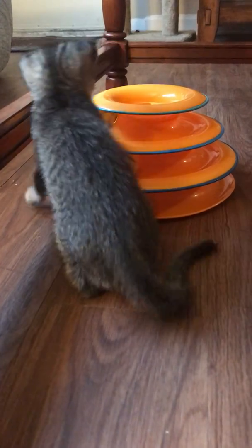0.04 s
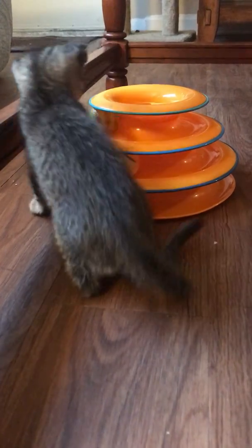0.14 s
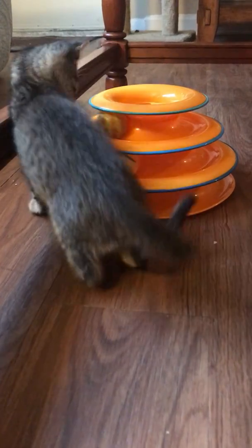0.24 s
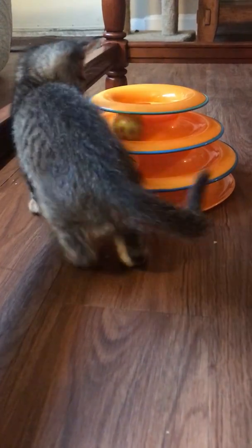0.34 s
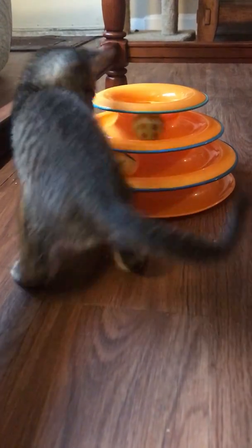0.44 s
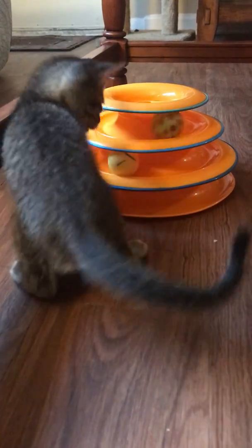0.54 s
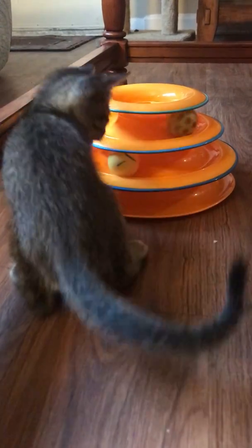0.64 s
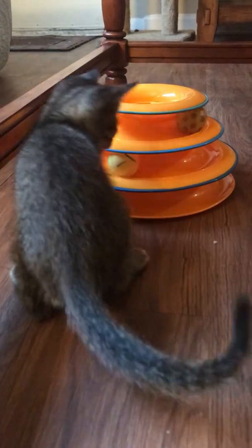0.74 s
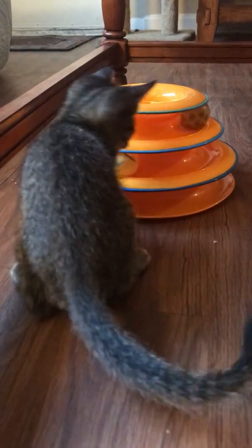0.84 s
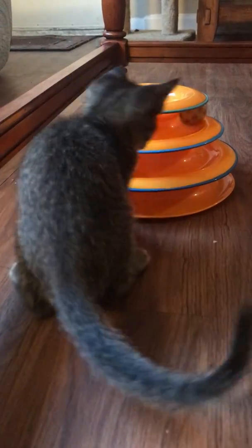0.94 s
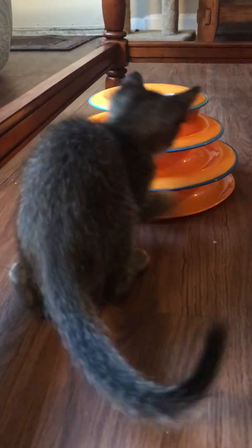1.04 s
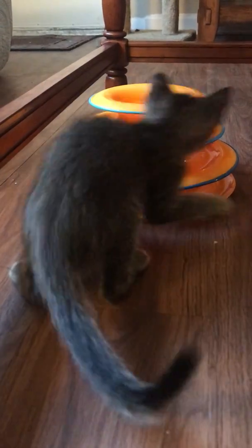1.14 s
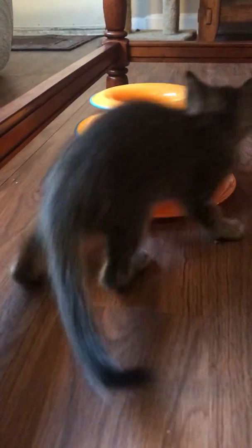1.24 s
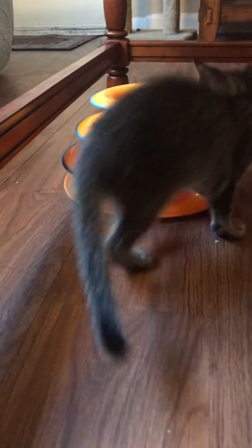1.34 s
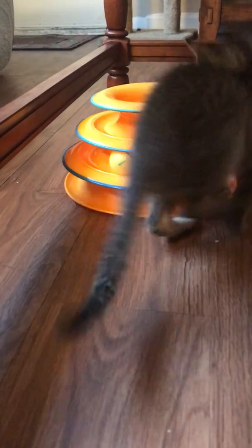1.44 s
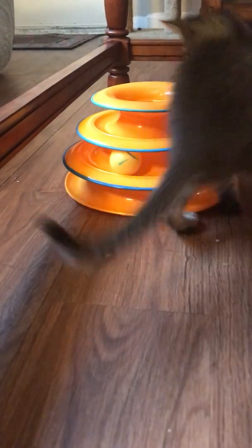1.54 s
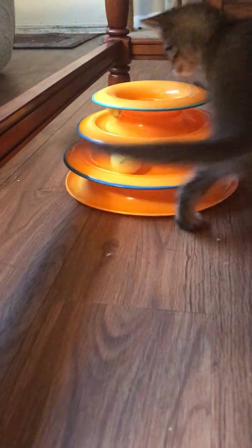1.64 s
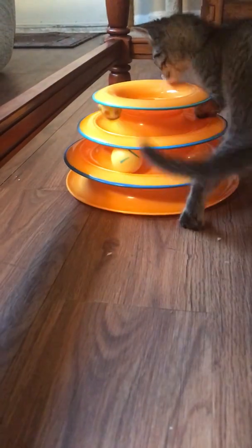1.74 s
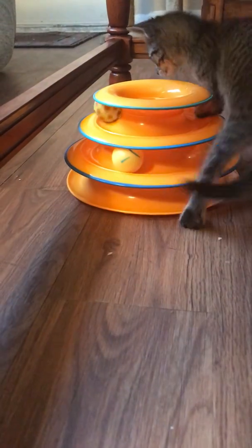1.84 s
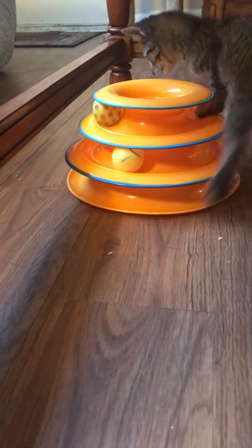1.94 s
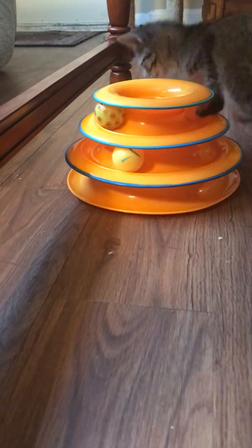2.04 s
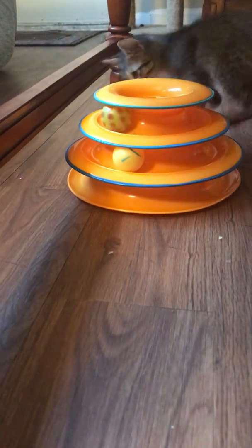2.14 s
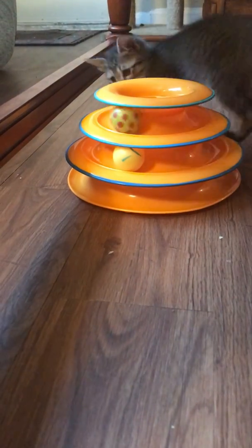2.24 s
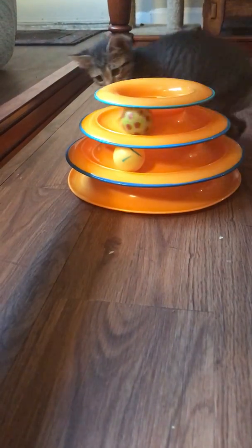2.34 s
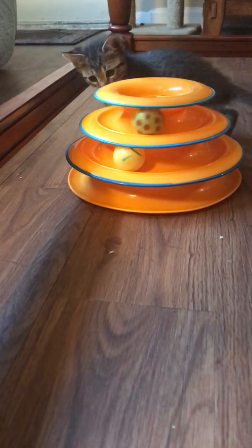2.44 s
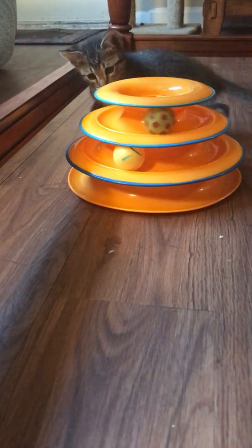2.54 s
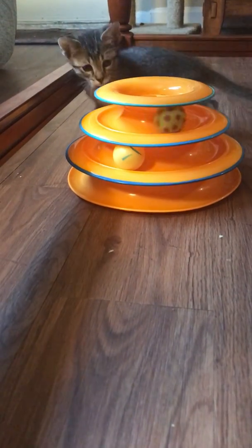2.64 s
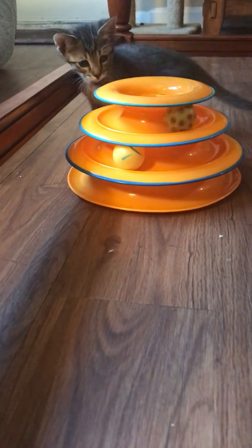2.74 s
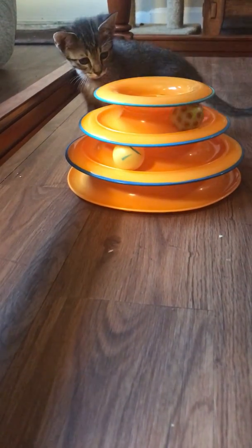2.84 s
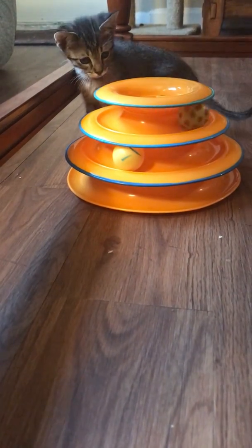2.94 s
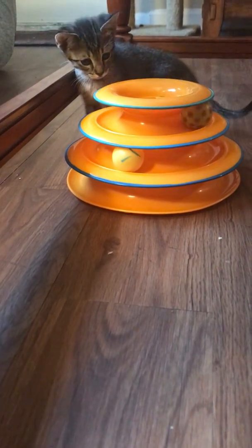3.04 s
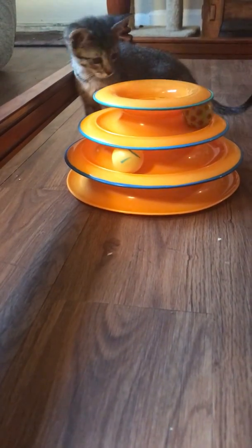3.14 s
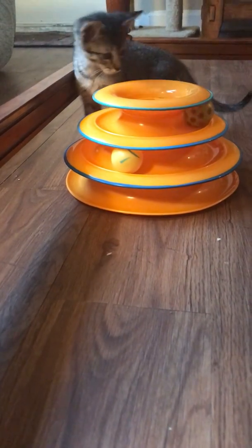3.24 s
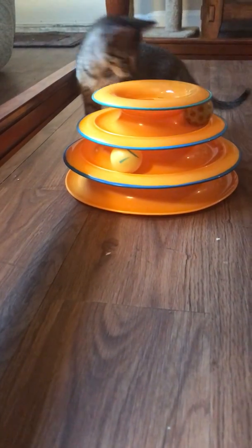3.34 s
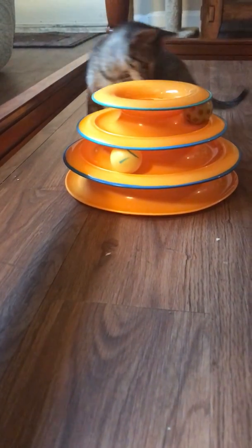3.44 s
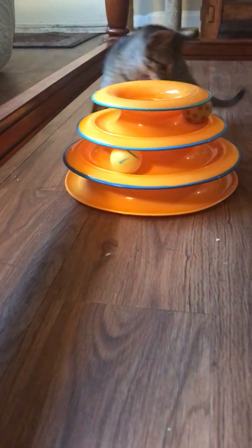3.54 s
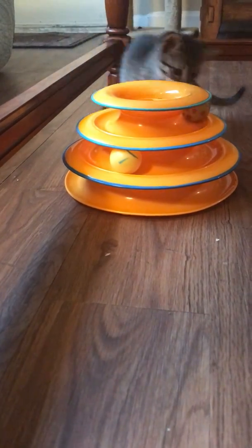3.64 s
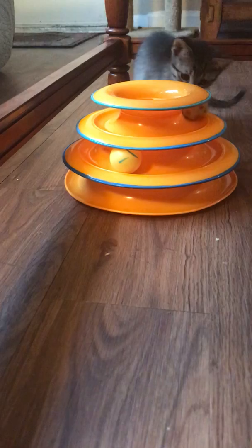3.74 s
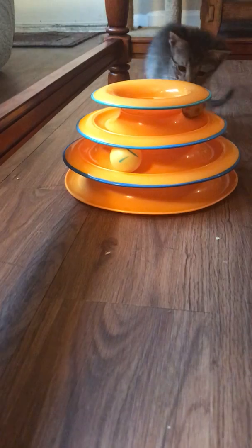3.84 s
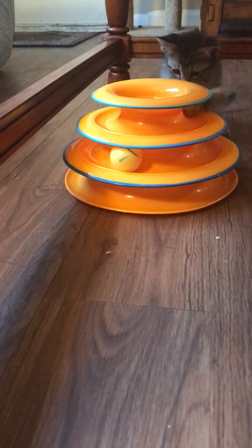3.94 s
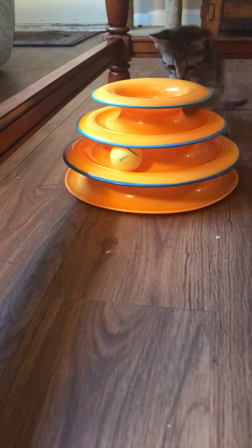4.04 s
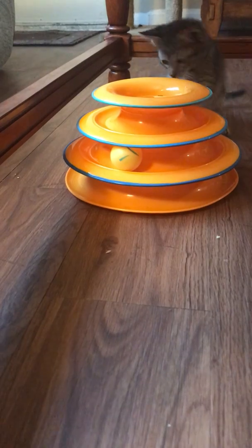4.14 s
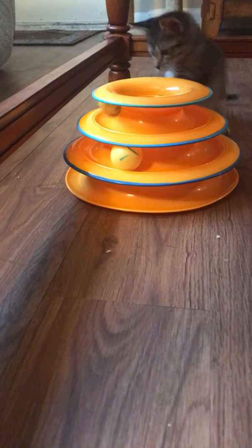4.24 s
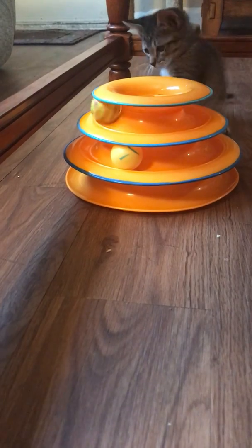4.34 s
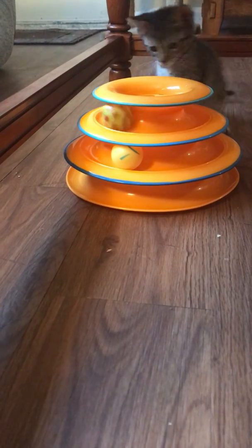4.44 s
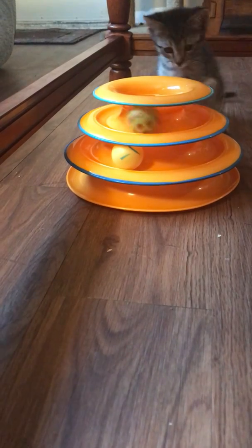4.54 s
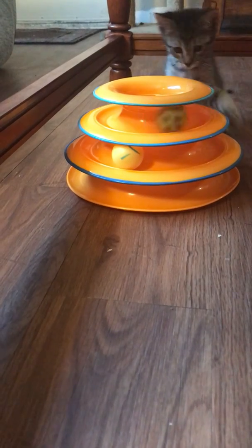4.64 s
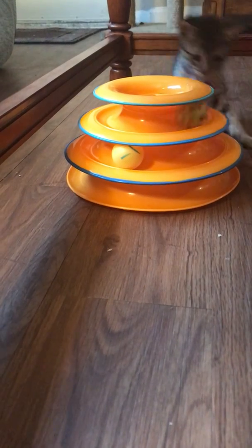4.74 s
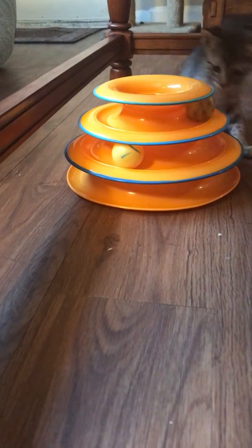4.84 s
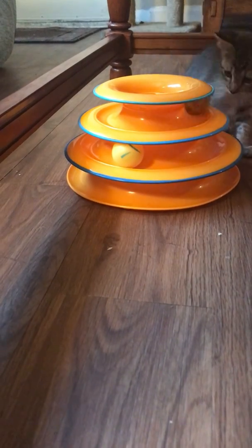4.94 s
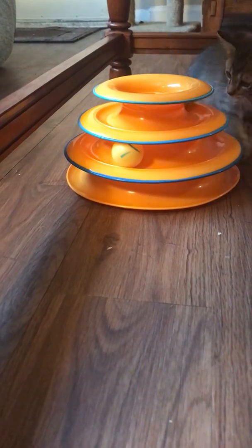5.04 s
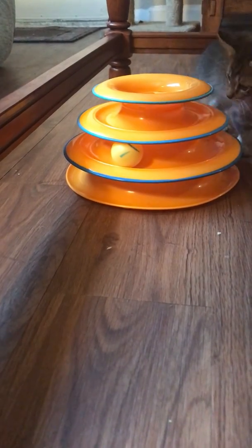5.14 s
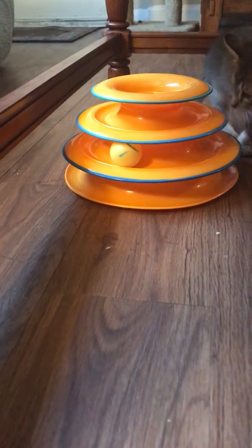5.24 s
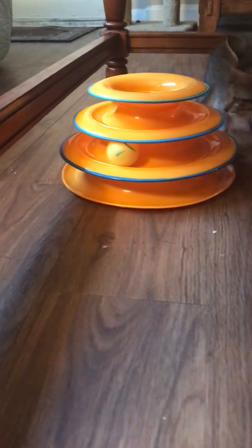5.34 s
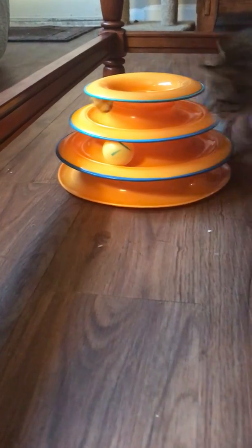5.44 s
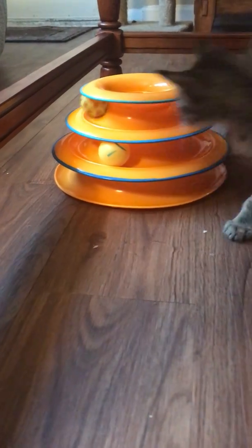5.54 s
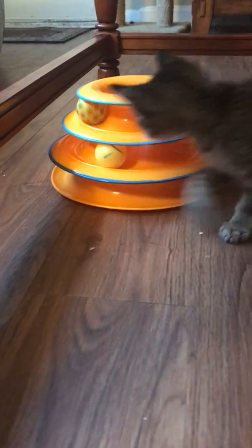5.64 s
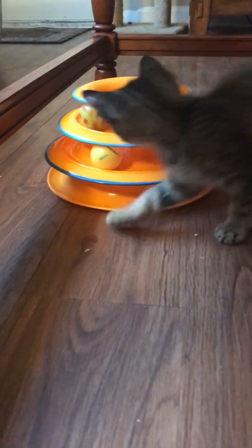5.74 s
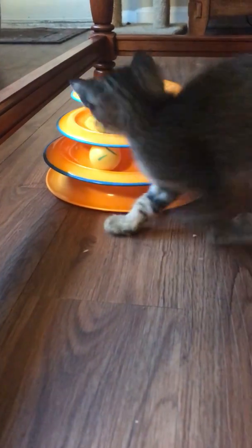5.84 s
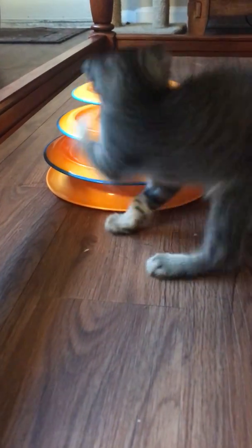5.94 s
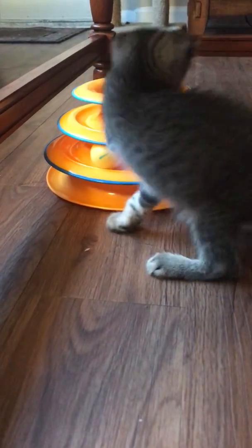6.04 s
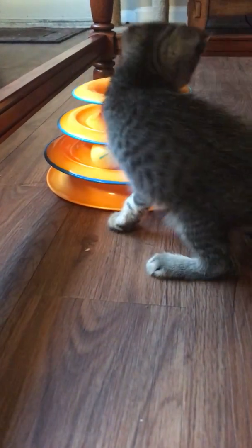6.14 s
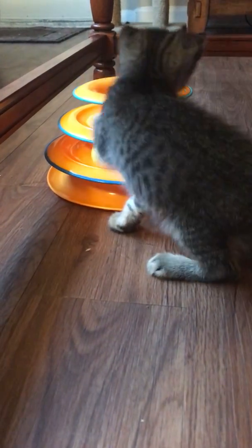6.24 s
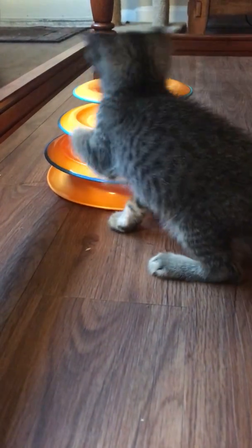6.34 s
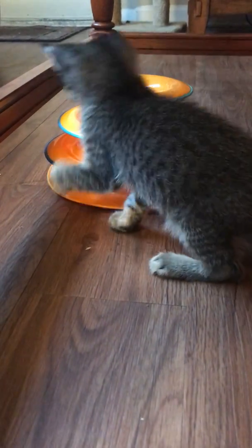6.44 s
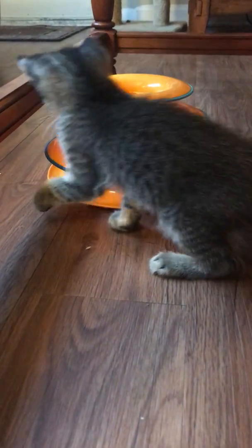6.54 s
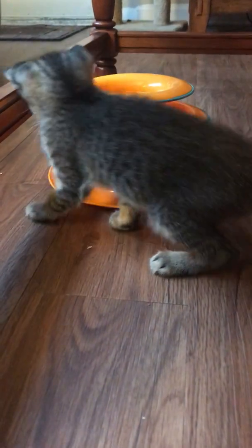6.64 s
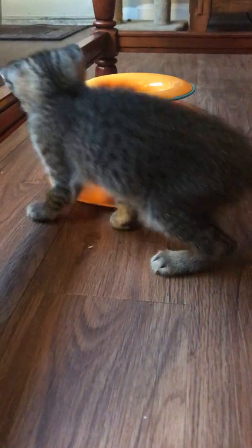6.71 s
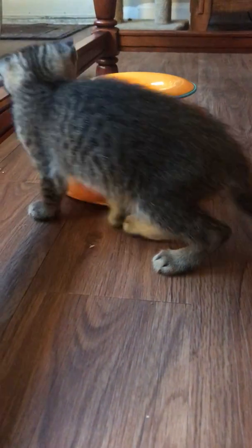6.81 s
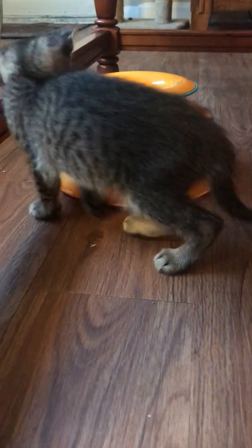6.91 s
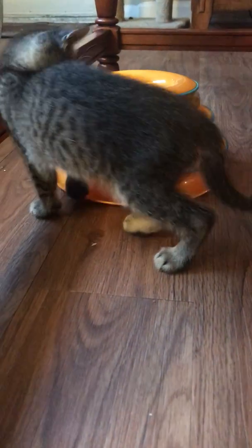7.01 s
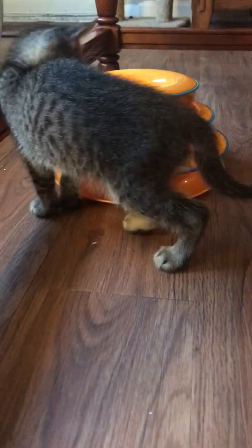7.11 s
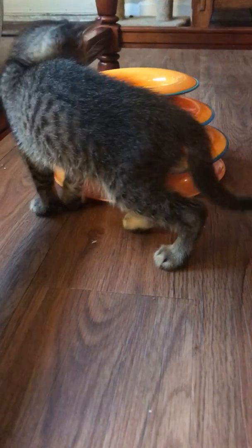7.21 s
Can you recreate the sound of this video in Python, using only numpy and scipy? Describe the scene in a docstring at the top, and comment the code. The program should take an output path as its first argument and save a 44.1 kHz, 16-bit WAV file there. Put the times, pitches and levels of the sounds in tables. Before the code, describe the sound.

Quiet room with soft air noise and low hum. A light holed plastic ball stumbles along a hollow plastic track, giving woody, boxy knocks and a rough rumble that fades, with fur brushes, claw ticks and a crisp snap midway. After a short rest, sharp knocks and brief squeaky slides restart a busier roll lasting to the end. Near microphone, short small-room echo.

```python
"""Over a quiet room with an appliance hum, a kitten bats hollow plastic balls round a tower toy on laminate.
First a ball rumbles and knocks along its track, with claw ticks, soft scuffs and a hard snap near 2.4 s;
it stalls at 3.5 s, and from 4 s a swat brings harder knocks, firm slides and a second roll to the end.
Random bumps and bursts of noise ring the toy's resonances; shaped noise makes fur, claws, snaps and ball whistle.
The room is coloured noise with wavering tones, and a short noise tail gives its echo."""
import sys
import numpy as np
from scipy import signal
from scipy.fft import rfft, irfft, next_fast_len
from scipy.io import wavfile
from scipy.ndimage import map_coordinates

SR = 44100
rng = np.random.default_rng(int(sys.argv[2]) if len(sys.argv) > 2 else 0)


def generate_wav(signal):
    """Clip the signal to [-1, 1] and save it as 16-bit WAV at the path in sys.argv[1]."""
    frames = np.transpose(np.atleast_2d(signal))
    scaled = np.clip(frames, -1, 1) * 32767
    pcm = np.round(scaled).astype(np.int16)
    wavfile.write(sys.argv[1], SR, pcm)


N = 320607  # length in samples


def amp(db):
    """Gain of a level in dB."""
    return 10 ** (np.asarray(db) / 20)


def unit(x):
    """Scale to rms 1."""
    return x / np.sqrt(np.mean(x ** 2) + 1e-20)


def along(points, hz):
    """Read a curve of (Hz, value) points on a log frequency axis."""
    point_hz, values = np.transpose(points)
    return np.interp(np.log(hz + 1), np.log(point_hz + 1), values)


def wobble(rate):
    """A smooth random curve with the given number of knots a second."""
    knots = rng.standard_normal(int(N * rate / SR) + 4)
    return map_coordinates(knots, [np.arange(N) * rate / SR])


def filtered(x, response):
    """Pass x through a complex response, given as a function of frequency."""
    size = next_fast_len(N + SR // 2)
    spectrum = rfft(x, size) * response(np.fft.rfftfreq(size, 1 / SR))
    return irfft(spectrum, size)[..., :N]


def causal(gain):
    """Minimum-phase response: the given magnitudes with no ringing ahead of the hit."""
    cepstrum = irfft(np.log(gain + 1e-6))
    half = len(cepstrum) // 2
    cepstrum[1:half] *= 2
    cepstrum[half + 1:] = 0
    return np.exp(rfft(cepstrum))


def noise(spectrum):
    """Coloured noise of rms 1."""
    return unit(filtered(rng.standard_normal(N), lambda hz: amp(along(spectrum, hz))))


# colour of the room's air: [pitch_hz, relative density_db per Hz]
AIR_COLOUR = [(20, -35), (30, -17), (50, -1.5), (100, 1), (150, -7.5), (300, -13), (600, -12.5),
              (1200, -15), (2000, -21.5), (4000, -29), (6000, -35), (10500, -41), (13000, -39),
              (16000, -40)]
# colour of the deep rumble: [pitch_hz, relative density_db per Hz]
RUMBLE_COLOUR = [(20, -47), (35, -6), (60, 1), (95, -0.5), (125, 0), (200, -63)]
# appliance tones: [pitch_hz, level_db rms before wavering]
HUM_TONES = [(120, -64), (122.8, -66.5), (166, -70.5), (246, -76.5), (369, -74.5)]
AIR_DB, RUMBLE_DB, RUMBLE_SWELL_DB = -59.5, -62.5, 1.5


def room_tone():
    """Steady air noise, a deep swelling rumble and appliance tones that waver in level and phase."""
    t = np.arange(N) / SR
    hum = np.zeros(N)
    for hz, db in HUM_TONES:
        level = np.sqrt(2) * amp(db + 1.9 * wobble(6.0))
        phase = 1.33 * wobble(3) + 2 * np.pi * rng.random()
        hum += level * np.sin(2 * np.pi * hz * t + phase)
    air = amp(AIR_DB) * noise(AIR_COLOUR)
    rumble = amp(RUMBLE_DB + RUMBLE_SWELL_DB * wobble(1.26)) * noise(RUMBLE_COLOUR)
    return hum + air + rumble


# how long the room rings: [pitch_hz, t60_s]
ROOM_DECAY = [(200, 0.13), (2000, 0.22), (10000, 0.078)]


def walls(x):
    """Each frequency of the room's answer dies at its own speed; four paths scatter the sound differently."""
    hz, t, grains = signal.stft(rng.standard_normal((4, SR // 3)), SR, nperseg=256)
    decay = amp(-60 * t / along(ROOM_DECAY, hz)[:, None])
    tails = signal.istft(grains * decay, SR, nperseg=256)[1]
    tails = tails / np.linalg.norm(tails[0])
    # the paths take turns, 64 samples each
    path = (np.arange(N) // 64) % 4 == np.arange(4)[:, None]
    wet = signal.oaconvolve(x * path, tails, axes=1).sum(0)
    return np.pad(wet, (200, 0))[:N]  # the answer starts 200 samples late


# colour of fur on plastic: [pitch_hz, relative density_db per Hz]
FUR_COLOUR = [(1470, -38), (2500, -5), (3110, -18), (3660, -10), (4910, -11), (7710, -9), (8330, -8),
              (9580, -6), (14200, -0.5), (16000, -2.5)]


def tilted(drive):
    """Colour a dull and a bright drive as fur on plastic, parted at 7.5 kHz."""
    def response(hz):
        fur = amp(along(FUR_COLOUR, hz))
        dull = 1 / (1 + (hz / 7500) ** 4)
        return np.array([causal(unit(fur * dull)), causal(unit(fur * (1 - dull)))])
    return filtered(drive, response).sum(0)


SLIDE_FADE_DB = -4.5  # change from start to end of a slide


def slide(s, length):
    """Pressure of a slide: it starts and stops within ms and eases off on the way."""
    t, edge = np.arange(N) / SR, min(.012, 0.49 * length)
    rise, fall = (t - s) / (0.19 * edge), (s + length - t) / edge
    gate = np.clip(np.minimum(rise, fall), 0, 1) ** 2
    return gate * amp(SLIDE_FADE_DB * np.clip((t - s) / length, 0, 1))


# fur and pads sliding: [start_s, length_s, drive level_db, brightness_db, squeak_db against the drive]
SLIDES = [(0.177, 0.023, -69, 6, -20), (1.693, .03, -63, -1.5, -20), (1.738, 0.067, -66, -2, -20),
          (1.8, 0.072, -53.5, 3.5, -36), (1.953, 0.047, -65, 3, -20), (2.178, 0.042, -56, 4.5, -27),
          (2.289, 0.061, -58.5, 5, -23), (2.414, 0.403, -59.5, 3.5, -22), (4.063, 0.081, -45.5, 4.5, -30),
          (4.191, 0.09, -39.5, 4.5, -12), (4.281, 0.048, -51, -2.5, -18), (4.322, 0.026, -38, 14, -23),
          (4.606, .12, -64, 10, -9), (4.949, 0.057, -55, 2, -15), (5.764, 0.11, -64, 5, -22),
          (6.092, 0.04, -41, -7, -3), (6.124, 0.069, -46.5, 3.5, -22), (6.203, 0.077, -65, -7, -22)]
SQUEAK_HZ, SQUEAK_HALF_WIDTH_HZ = 3680, 26  # a pad skids and rings the rim


def brushing():
    """Each slide is a grainy hiss of fur and pads, with a narrow-band squeak of the rim."""
    hiss, squeak = np.zeros((2, N)), np.zeros(N)
    for s, length, db, bright_db, squeak_db in SLIDES:
        press = amp(db) * slide(s, length)
        hiss += press * amp([[-bright_db - 4.5], [bright_db - 15]])  # dull, bright
        squeak += press * amp(squeak_db)
    rim = lambda hz: 1 / (1 + ((hz - SQUEAK_HZ) / SQUEAK_HALF_WIDTH_HZ) ** 2)
    ring = unit(filtered(rng.standard_normal(N), rim))
    grain = amp(0.61 * wobble(90)) * rng.standard_normal((2, N))
    return tilted(hiss * grain) + squeak * ring


# claw ticks: [start_s, relative level_db, brightness_db]
CLAW_TICKS = [(0.213, -32.5, 8), (0.3376, -41, 0), (0.62, -59, 5), (0.815, -47, 0), (1.1742, -38, 11),
              (1.7275, -37, 8), (1.9933, -33, 5), (4.2914, -34, -9), (4.9756, -54, 5), (5.1545, -30.5, 13),
              (5.2969, -56, 5), (5.7076, -55.5, -10.5), (5.9933, -27.5, 6), (6.774, -43, -5),
              (7.0044, -55, 5)]


def claws():
    """Tiny ticks of a claw tip: noise dying in a few ms, coloured like fur on plastic."""
    t = np.arange(SR // 30) / SR
    drive = np.zeros((2, N + len(t)))
    for s, db, bright_db in CLAW_TICKS:
        level = amp([[db - 23 - 2 * bright_db], [db - 19.0]])  # dull, bright
        tick = level * np.exp(-t / 0.0044) * rng.standard_normal((2, len(t)))
        drive[:, round(s * SR):][:, :len(t)] += tick
    return tilted(drive[:, :N])


# a sharp snap with its faint lead-in tick and a small crisp bounce: [start_s, crack drive_db, body drive_db]
SNAP_HITS = [(2.39, -48, -68), (2.3995, -21, -25.5), (2.423, -41, -67)]
# colour of the crack: [pitch_hz, relative density_db per Hz]
CRACK_COLOUR = [(800, -30), (2000, -12), (3200, -1), (4200, -1), (6000, -4), (9000, -13), (14000, -8),
                (16000, -11)]
# colour of the body: [pitch_hz, relative density_db per Hz]
BODY_COLOUR = [(150, -46), (350, 1), (600, 6.5), (900, -18), (1500, 2.5), (2600, -9), (5000, -33),
               (9000, -46)]


def snaps():
    """A hard bright crack gone within a few ms; the duller body swells just behind it."""
    t = np.arange(SR // 8) / SR
    crack = np.exp(-t / 0.0036)
    crack[0] = 4.5  # the first contact is one sharp spike
    body = np.exp(-t / 0.0081) * (1 - np.exp(-t / 0.0035))
    shapes = np.array([crack, body])
    drive = np.zeros((2, N + len(t)))
    for s, crack_db, body_db in SNAP_HITS:
        hit = amp([[crack_db], [body_db]]) * shapes * rng.choice([-1, 1], (2, len(t)))
        drive[:, round(s * SR):][:, :len(t)] += hit

    def response(hz):
        return np.array([causal(unit(amp(along(c, hz)))) for c in (CRACK_COLOUR, BODY_COLOUR)])
    return filtered(drive[:, :N], response).sum(0)


# narrow high modes of the ball: [pitch_hz, half_width_hz, relative level_db]
SHELL_MODES = [(8104, 100, 1.5), (9200, 76, -32), (10200, 72, -13), (12060, 87, -5.5), (13500, 190, -8)]
WHISTLE_DB, WHISTLE_FADE_S = -7, 0.011  # after a knock, against its shell level
SLIDE_WHISTLE_DB, FIRM_SLIDE_DB = -60, -40  # whistle drive of a slide at the firm level
SLIDE_GROWS = 1.7  # whistle dB for each dB of pressure
ROLL_WHISTLE_DB = -25  # against the rattle, before its drift


def whistle():
    """Fast-fluttering friction noise in the ball's high modes: after knocks, under firm paws and as it rolls."""
    s, levels_db = knock_levels()
    kicks = np.bincount(np.round(s * SR).astype(int), amp(levels_db[:, 4] + WHISTLE_DB), N)
    skid = signal.lfilter([1], [1, -np.exp(-1 / (WHISTLE_FADE_S * SR))], kicks)
    pushed = np.zeros(N)
    for start, length, db, *_ in SLIDES:
        pushed += amp(SLIDE_WHISTLE_DB + SLIDE_GROWS * (db - FIRM_SLIDE_DB)) * slide(start, length)
    rolled = amp(roll_levels()[-1] + ROLL_WHISTLE_DB + 3.2 * wobble(12))
    flutter = amp(5.0 * wobble(45))
    modes = lambda f: sum(amp(db) / (1 + ((f - hz) / w) ** 2) for hz, w, db in SHELL_MODES)
    return (skid + pushed + rolled) * flutter * unit(filtered(rng.standard_normal(N), modes))


# a ball rolls until it stalls, then again after a swat; one table a run, levels before the part trims:
# [time_s, hum of the hollow_db, low wall_db, rattle of the high wall_db]
ROLLS = [
    [(0.0, -54.5, -52, -62.5), (0.39, -48.5, -59, -62), (0.48, -49.5, -65, -69), (0.65, -54, -59.5, -63),
     (1.08, -56.5, -63.5, -70.5), (1.35, -54, -57.5, -63), (1.95, -58, -68, -67.5),
     (2.23, -56.5, -73, -65.5), (2.43, -62, -73, -68), (2.89, -59, -73, -65), (3.09, -63, -67, -69),
     (3.34, -60, -63.5, -70), (3.52, -60, -77, -71)],
    [(4.06, -70, -66, -70), (4.1, -57, -70, -58), (4.23, -48, -55, -50.5), (4.42, -47.5, -54, -52),
     (4.63, -49, -56.5, -63), (4.8, -50.5, -50, -54.5), (4.97, -50.5, -49, -58.5), (5.79, -53, -64, -62),
     (6.08, -52, -57, -59), (6.29, -49, -42.5, -52), (6.77, -48, -57, -56.5), (6.96, -53, -48.5, -57),
     (7.27, -53.5, -51.5, -62)],
]


def roll_levels():
    """Levels of the rolling ball in dB, practically silent while it rests."""
    t = np.arange(N) / SR
    gains = np.zeros((3, N))
    for run in ROLLS:
        time_s, *columns = np.transpose(run)
        gains += np.array([amp(np.interp(t, time_s, column, -140, -140)) for column in columns])
    return 20 * np.log10(gains)


# five parts of the toy, in this order throughout: hollow | low wall | high wall | rim | ball shell
SPLIT_HZ = (780, 1550, 2950, 7000)
ROLL_PART_DB = (0.5, -5, -6, -23, -21.5)  # rolling trim of each part


def roll_parts():
    """Rolling level of the five parts in dB; rim and shell follow the rattle."""
    hum, low, rattle = roll_levels()
    return np.array([hum, low, rattle, rattle, rattle]) + np.array(ROLL_PART_DB)[:, None]


BUMPS_PER_S = 130
DRIFT_DB = (0.72, 3.2, 3.5, 3.1, 2.5)  # colour drift of each part as the ball moves round


def rolling():
    """The holed ball stumbles over the track: dense small bumps on a rough rumble."""
    heights = amp(1.75 * rng.exponential(size=N).clip(0, 2.5))
    bumps = (rng.random(N) < BUMPS_PER_S / SR) * heights
    chatter = signal.lfilter([1], [1, -np.exp(-1 / (0.0022 * SR))], bumps)
    # the hollow hums on between bumps, the treble does not
    smooth = np.array([[2.5], [.45], [.35], [.3], [.3]])
    drift = np.array([db * wobble(7) for db in DRIFT_DB])
    grit = (smooth + chatter) * amp(1.86 * wobble(13) + drift) * rng.standard_normal((5, N))
    return grit / grit.std(1, keepdims=True) * amp(roll_parts())


# ball knocks, before the part trims: [start_s, low wall level_db, then against that level:
# hollow share_db, hardness_db (high wall), bite in the treble_db (rim and shell)]
BALL_KNOCKS = [(0.023, -35.5, -22, -12, -26.5), (0.048, -35.5, -5.5, -8.5, -30.5),
               (0.066, -34, -4, -22, -28), (0.085, -38.5, -3, -5.5, -23), (0.111, -48, -6, -12, -27),
               (0.136, -41, 5, -7, -30), (0.178, -39.5, 5, -15, -26), (0.198, -35.5, -7, -23, -27),
               (0.257, -42, 2, -16, -25), (0.347, -42, -1, -15, -21), (0.393, -34.5, -2, -7.5, -20),
               (0.414, -41, -7, -4, -23), (0.448, -35, 3, -3, -22), (0.467, -37.5, -3, -6, -24),
               (0.499, -43, -5, -6.5, -18), (0.556, -41, -3, -11, -19.5), (0.702, -37.5, 2, -10, -27.5),
               (0.736, -41.5, -1, -6, -19), (0.815, -44, -1, -8, -17), (0.876, -39.5, -4, -12.5, -24),
               (0.96, -39.5, -6, -26, -30), (0.997, -42, -7, -21, -28), (1.056, -38, 1, -28, -27),
               (1.1, -43, 0, -24, -23), (1.123, -40.5, -4, -24, -27), (1.176, -36.5, -12, -22, -30.5),
               (1.245, -46, -10, -22, -25), (1.299, -41, -1, -18, -23.5), (1.319, -45, -10, -17, -32),
               (1.349, -36, -0.5, -14, -27), (1.384, -42, -9, -19, -22), (1.424, -41, -7, -7.5, -30),
               (1.438, -35, -3.5, -12.5, -35), (1.642, -43.5, 4.5, -16, -24), (1.693, -44, 8.5, -14, -17),
               (1.822, -44.5, -2, -3, -13), (2.013, -43.5, 3.5, -14, -23), (2.074, -45.5, 3, -19, -21),
               (2.274, -51.5, 12.5, -7, -19), (2.324, -55, 11, -5, -12), (2.639, -48.5, 3, -6, -19),
               (2.727, -47, 2, -11, -22), (2.741, -43.5, 0.5, -10, -23), (2.826, -53.5, 3, -7, -19),
               (2.85, -54, 0, -9, -21), (2.909, -55, 2, -2, -25), (2.995, -48.5, 3, -2.5, -20),
               (3.008, -49, -10, -9, -22), (4.047, -18, -29, -12.5, -18.5), (4.063, -23.5, -7, -9, -18),
               (4.114, -23, -7.5, -12, -29), (4.144, -37, -19, -12, -20), (4.163, -37.5, -4, -2, -24),
               (4.182, -35, -2, -0.5, -7), (4.199, -28, -14, -11, -6.5), (4.245, -46.5, -6, -12, -1),
               (4.298, -35.5, -9, -7, -8), (4.31, -31.5, -22, -21, -8.5), (4.38, -28, -4, -6, -18),
               (4.396, -28, -2, -8.5, -15.5), (4.427, -40, -4, -12, -19), (4.465, -40.5, -4, -21, -18),
               (4.512, -48, 3, -16, -12), (4.555, -42, -10, -17, -15), (4.566, -38, -1, -12, -17),
               (4.587, -33, -6, -3.5, -18.5), (4.619, -28.5, -5, -6.5, -19.5), (4.64, -35, 7, -6, -18),
               (4.654, -32.5, -4, -4, -15.5), (4.677, -37.5, -14, -3.5, -17), (4.706, -33.5, -12, -7, -22),
               (4.734, -42, -5.5, -7, -27), (4.77, -40.5, -5, -4, -18), (4.784, -35.5, -2, -7, -20),
               (4.795, -36, -2, -8, -21), (4.829, -39, -6, -5, -27), (4.871, -31.5, -1.5, -4.5, -22),
               (4.914, -30.5, -3, -8, -22.5), (4.938, -28.5, -8, -9, -26), (4.977, -30, -5, -10.5, -18.5),
               (5.028, -37.5, -5, -21, -21), (5.054, -43, 0, -23, -18), (5.179, -35.5, -3, -20, -28),
               (5.257, -39.5, -6, -7, -22), (5.278, -35, -3, -7, -27), (5.293, -38, -12, -3.5, -20),
               (5.348, -27.5, -5, -6.5, -17.5), (5.388, -35.5, -13, -12, -25), (5.443, -37.5, -3, -15, -23),
               (5.499, -37.5, -4, -12, -26), (5.587, -43, 4, -12, -20), (5.782, -39.5, -4, -5.5, -17.5),
               (5.85, -44.5, 5, -7, -19), (5.911, -46, 5, -6, -25), (5.993, -42, 10, -6, -20),
               (6.041, -55, 18, 0, -16), (6.08, -25, 0, -3.5, -16), (6.097, -17, -16, -14, -13.5),
               (6.11, -27, 3, -0.5, -7), (6.117, -27.5, -10, -8, -8.5), (6.227, -31, -2.5, -8, -25),
               (6.239, -22.5, -17, -15, -27.5), (6.301, -34.5, -16, -24, -19.5),
               (6.317, -33, -14, -10, -19), (6.349, -42, -12, -11, -27), (6.395, -28, -20, -4.5, -17.5),
               (6.406, -32, -11, -6, -21), (6.443, -41.5, -22, 0.5, -20), (6.471, -35.5, -11, -5, -18),
               (6.482, -29.5, -7.5, -6.5, -21), (6.514, -34.5, -17, -8, -17.5), (6.566, -30, -13, -6, -15),
               (6.576, -27, -13, -7, -23), (6.598, -43, -4, -8, -30), (6.639, -41, -8, -7, -19),
               (6.646, -32, -2, -13, -19.5), (6.659, -26, -9.5, -17, -27), (6.749, -32, -3, -6, -15),
               (6.833, -39, 1, -2.5, -19), (6.846, -33, -4, -5, -19.5), (6.903, -37.5, -6, -5, -23),
               (6.92, -32, -3, -7, -26), (6.948, -32, -15, -6, -22), (6.964, -33, -11, -10, -27),
               (7.044, -36.5, -4, -4.5, -22), (7.059, -24.5, -5.5, -5, -20), (7.158, -33.5, -3, -14, -25),
               (7.176, -30.5, -4, -18, -27), (7.188, -30, -7.5, -24, -32), (7.25, -33.5, -12, -22, -28)]
PART_DB = (-5.5, -10, -1, -1, -8)  # knock trim of each part


def knock_levels():
    """Time and level of each part for the listed knocks; rim and shell share the bite."""
    s, level, hollow, hard, bite = np.transpose(BALL_KNOCKS)
    return s, level[:, None] + np.transpose([hollow, 0 * s, hard, bite, bite]) + PART_DB


# resonances of the tower and balls: [pitch_hz, width_hz, relative level_db]
TOY_MODES = [(467, 14, -9), (542, 23, 1), (582.7, 16, 7.5), (601, 28, 6), (643.5, 28, 3.5), (723, 32, -3),
             (922, 57, -2.5), (1006, 31, -1.5), (1310, 55, -0.5), (1376, 300, -3.5), (1816, 165, -2.5),
             (2120, 38, -11), (2310, 54, -18), (2575, 107, -12), (3900, 44, -32), (4260, 77, -20.5),
             (5500, 89, -47), (8600, 73, -27.5), (9100, 110, -45), (9800, 300, -33.5), (11540, 320, -26.5),
             (12800, 600, -29), (13800, 190, -35.5)]
CONTACT_S, FAVOUR_DB = 0.0058, -12


def favoured(t):
    """Each blow dwells on the wall: a rounded push at one chance resonance for each part of the toy."""
    hz = np.transpose(TOY_MODES)[0]
    part = np.searchsorted(SPLIT_HZ, hz)
    picks = np.array([rng.choice(hz[part == k]) for k in range(len(SPLIT_HZ) + 1)])
    push = np.sin(np.pi * np.clip(t / CONTACT_S, 0, 1)) ** 2
    return amp(FAVOUR_DB) * push * np.sin(2 * np.pi * picks[:, None] * t)


RATTLE_S, RATTLE_SPREAD = .006, .2  # base length of the chatter after a blow, and its log spread
BLOW_DB = -6  # clean blow against its chatter
STUMBLES_PER_S = 90  # small chance knocks
STUMBLE_DB, STUMBLE_SPREAD_DB = -1, 3.5  # over the rolling level, before the part trims
STUMBLE_PART_DB = (-5, 2.5, 4, 4, 6)  # they tick more than they boom


def knocks():
    """A knock is one clean blow, a quick rebound and a few ms of uneven chatter; the treble dies first."""
    t = np.arange(SR // 16) / SR
    drives = np.zeros((5, N + len(t)))
    s, levels_db = knock_levels()
    at = np.flatnonzero(rng.random(N) < STUMBLES_PER_S / SR)
    spread_db = STUMBLE_SPREAD_DB * rng.standard_normal((len(at), 5))
    small_db = roll_parts()[:, at].T + STUMBLE_DB + STUMBLE_PART_DB + spread_db
    starts = [*np.round(s * SR).astype(int), *at]
    blow = amp(BLOW_DB) * np.array([15.9, 12.6, 9, 4.5, 3])
    for i, level_db in zip(starts, [*levels_db, *small_db]):
        length = RATTLE_S * np.exp(RATTLE_SPREAD * rng.standard_normal())
        life = length * np.array([[.6], [.6], [.6], [.5], [.45]])
        uneven = amp(4.8 * rng.standard_normal(len(t) // 32 + 1).repeat(32)[:len(t)])
        envelope = np.exp(-t / life) * (1 - np.exp(-t / 0.0057))
        burst = envelope * uneven * rng.standard_normal((5, len(t)))
        # a long rattle spreads the same push over more time
        burst *= np.array([[9], [10], [11], [13], [14]]) / np.linalg.norm(burst, axis=1, keepdims=True)
        burst[:, 0] = blow
        rebound = int(SR * length * rng.uniform(.2, .6))
        burst[:, rebound] = 0.72 * blow * rng.choice([-1, 1])
        drives[:, i:][:, :len(t)] += amp(level_db)[:, None] * (burst + favoured(t))
    return drives[:, :N]


# colour of the contacts between the resonances: [pitch_hz, relative density_db per Hz]
CONTACT_COLOUR = [(100, -60), (250, -34), (450, -22), (640, -16), (800, -22), (1100, -19), (2000, -20),
                  (2700, -25), (3200, -33), (5500, -37), (9000, -44), (10600, -48), (13000, -41),
                  (15500, -42)]


def toy(drives):
    """Five drives ring the toy from hollow to ball shell; in each part white drive of rms 1 gives rms 1."""
    def response(f):
        peaks = sum(amp(2 * db) / (1 + (2 * (f - hz) / w) ** 2) for hz, w, db in TOY_MODES)
        power = peaks + amp(2 * along(CONTACT_COLOUR, f))
        # neighbouring low-passes differ by one part's band
        below = [0 * f] + [1 / (1 + (f / edge) ** 10) for edge in SPLIT_HZ] + [1 + 0 * f]
        shares = np.abs(np.diff(below, axis=0))
        return np.array([causal(unit(np.sqrt(power * share))) for share in shares])
    return filtered(drives, response).sum(0)


def scene():
    """Toy and kitten, their echo 14 dB down, and the room tone."""
    near = toy(knocks() + rolling()) + whistle() + snaps() + brushing() + claws()
    return (near + amp(-14) * walls(near) + room_tone())[None]


TOP_HZ = 15900


def record(dry):
    """A very steep low-pass keeps almost nothing above the band limit."""
    return filtered(dry, lambda hz: 1 / (1 + (hz / TOP_HZ) ** 120))


dry = scene()
out = record(dry)
generate_wav(out)
```